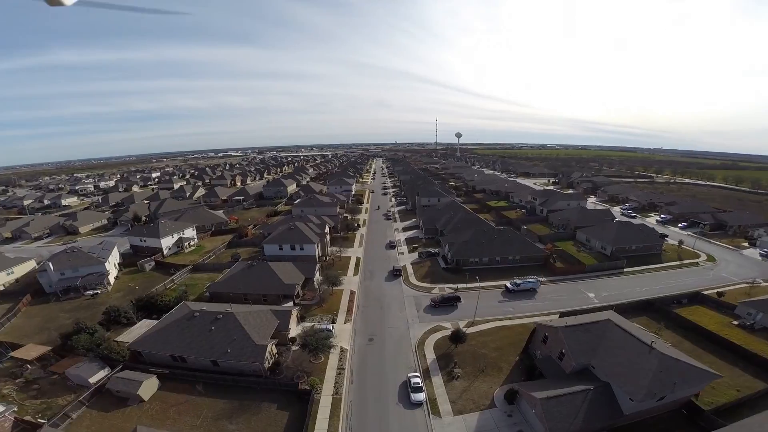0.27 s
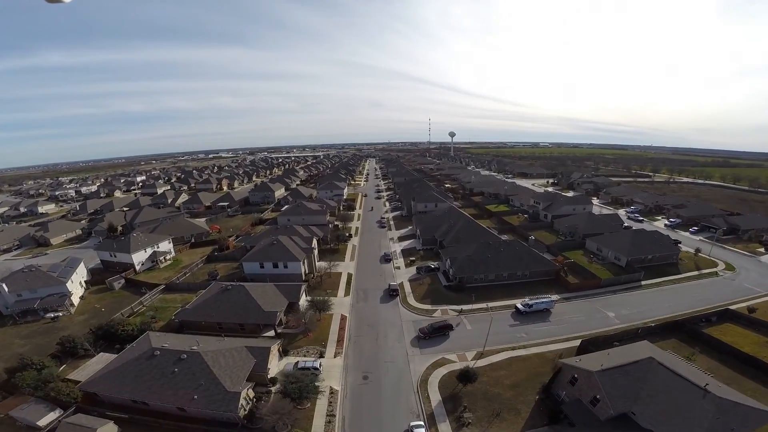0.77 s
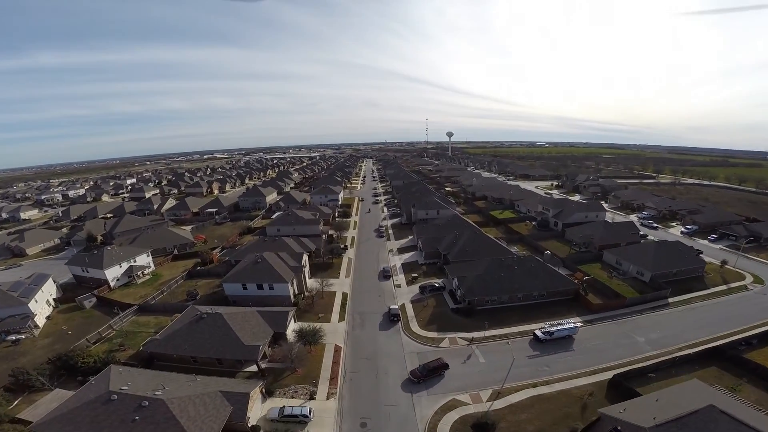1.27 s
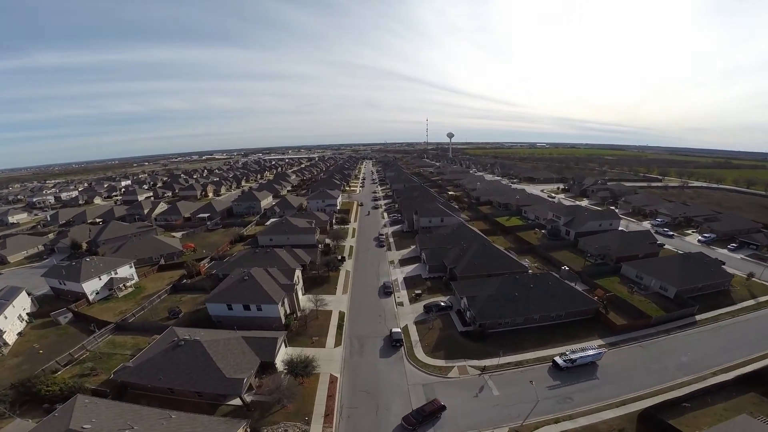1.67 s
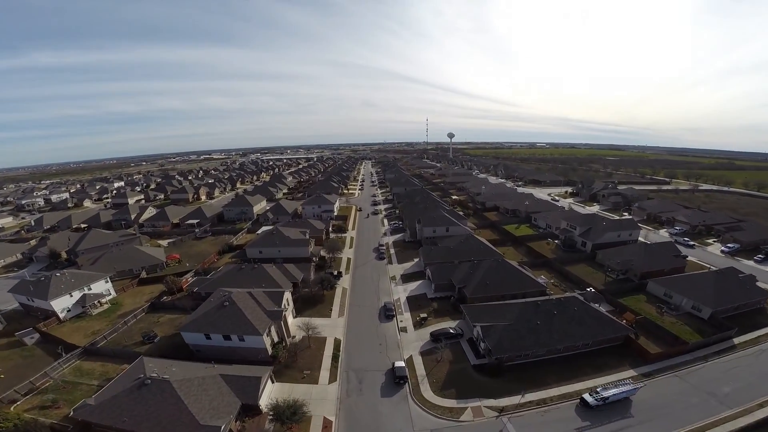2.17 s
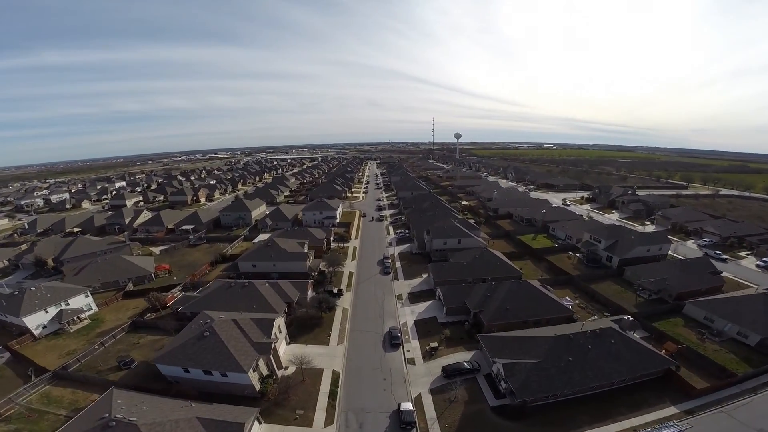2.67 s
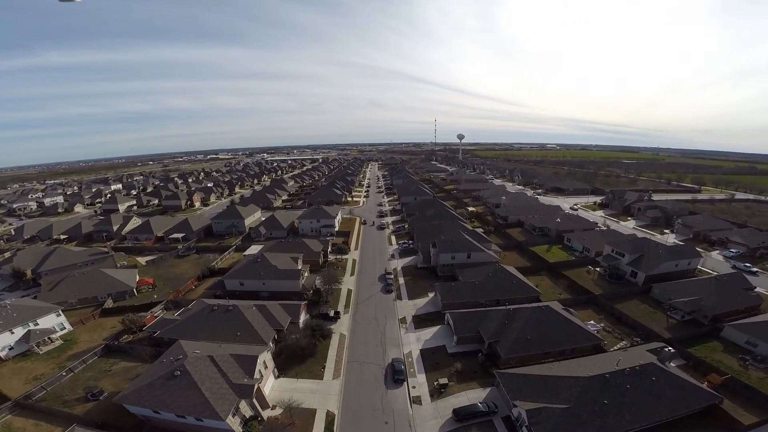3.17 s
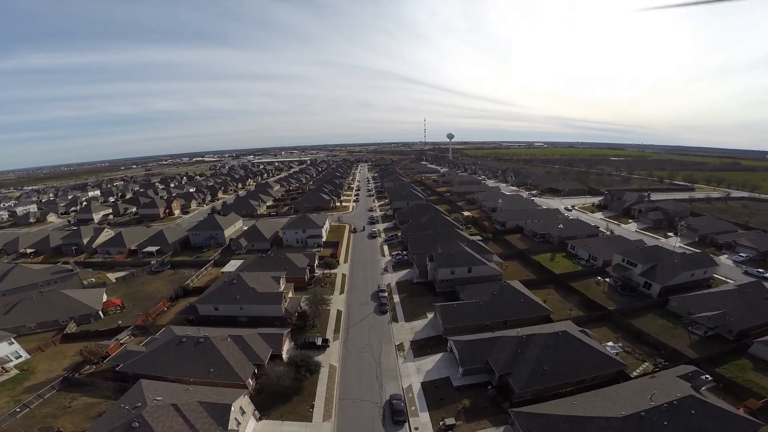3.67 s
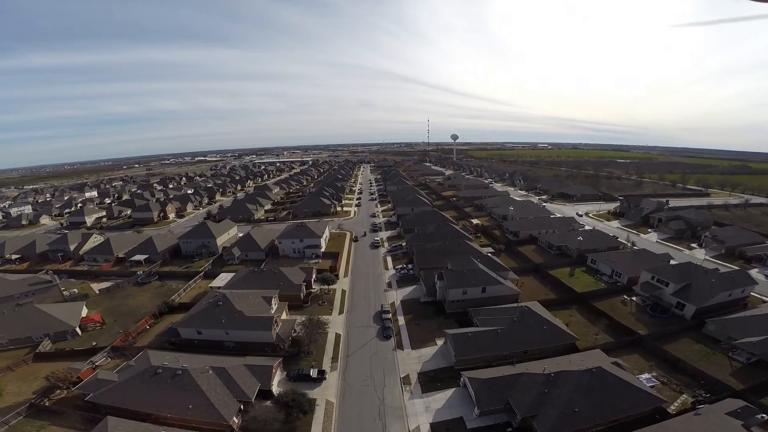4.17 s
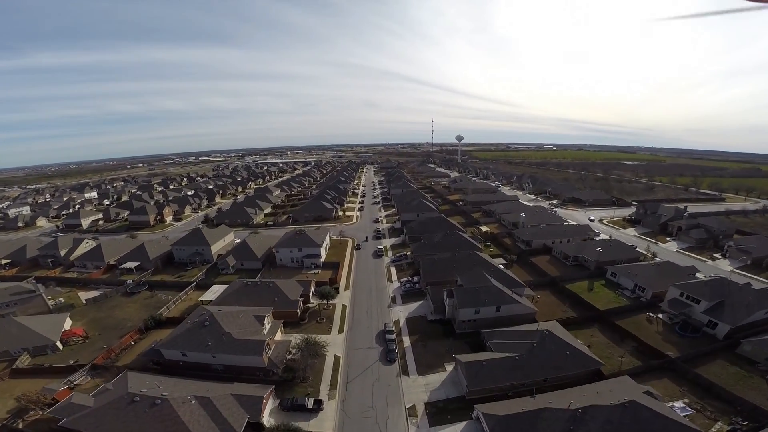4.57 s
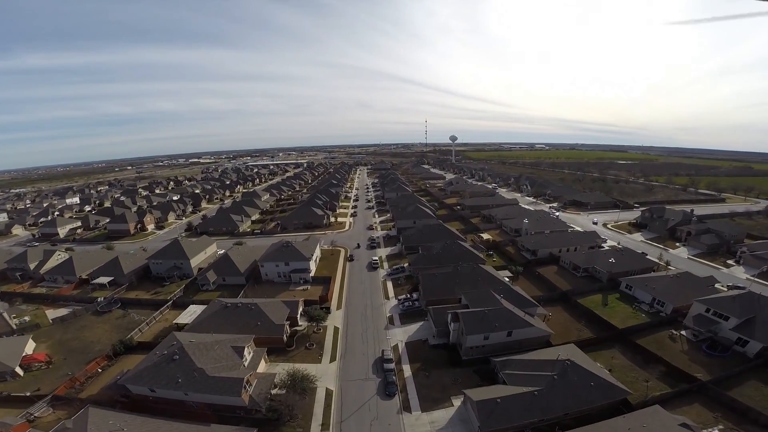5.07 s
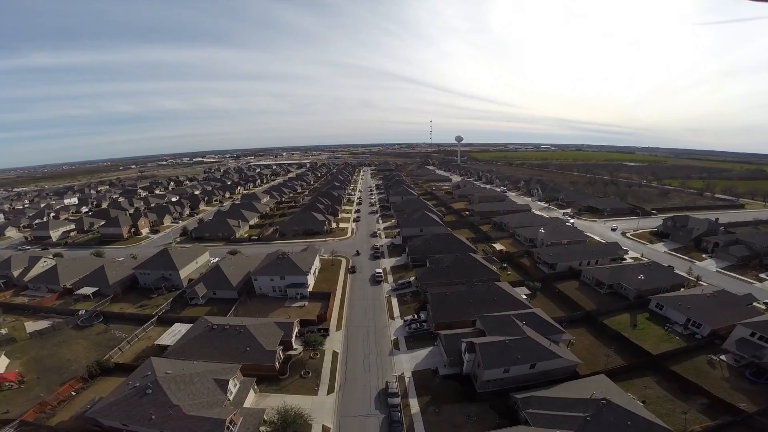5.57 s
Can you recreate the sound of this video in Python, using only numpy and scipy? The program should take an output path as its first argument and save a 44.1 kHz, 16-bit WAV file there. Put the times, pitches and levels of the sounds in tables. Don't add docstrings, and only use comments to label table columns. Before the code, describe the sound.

Onboard a small drone flying forward over houses, four rotors hum low and uneven, beating against each other under airy hiss and low wind rumble. At about 0.3 s a short hard rattle knocks the mount; the sound drops, climbs back over a second, and the buzz continues with soft gusts to the end.

```python
import sys
import numpy as np
from scipy import signal
from scipy.fft import rfft, irfft, next_fast_len
from scipy.io import wavfile
from scipy.ndimage import uniform_filter1d

SR = 44100
rng = np.random.default_rng(int(sys.argv[2]) if len(sys.argv) > 2 else 0)


def master(y):
    cut = np.clip(np.atleast_2d(y).T, -1, 1)
    pcm = np.round(cut * 32767)
    wavfile.write(sys.argv[1], SR, pcm.astype(np.int16))


def voltage_ratio(level):
    return 10 ** (np.asarray(level, float) / 20)


N = 257544
T = np.arange(N) / SR

# (time [s], rotor 1 [Hz], rotor 2 [Hz])
SLOW_PAIR = [(0.0, 93.5, 110.95), (0.4, 95.0, 106.57), (1.0, 97.3, 102.46), (1.45, 98.6, 105.29),
             (2.05, 95.2, 100.13), (2.6, 93.0, 102.13), (3.05, 92.0, 104.5), (3.35, 92.6, 99.66),
             (3.62, 93.0, 95.85), (3.89, 95.4, 95.49), (4.15, 92.8, 97.9), (4.6, 95.3, 102.75),
             (4.8, 96.6, 99.86), (4.97, 97.3, 96.76), (5.2, 96.6, 99.26), (5.5, 97.2, 103.07),
             (5.73, 98.6, 98.6), (5.84, 98.4, 99.81)]
# (time [s], rotor 3 [Hz], rotor 4 [Hz])
FAST_PAIR = [(0.0, 118.1, 124.8), (0.4, 117.9, 124), (1.0, 112.3, 119.65), (1.45, 116.6, 121.91),
             (2.05, 111.69, 120.09), (2.6, 112.92, 120.11), (3.05, 114.9, 121.91), (3.4, 113.1, 120.4),
             (3.7, 106.7, 117.2), (3.95, 108.7, 116), (4.15, 110.7, 118.3), (4.45, 112, 118.74),
             (4.7, 117, 120.61), (4.95, 111.5, 117.61), (5.2, 109.8, 118.21), (5.5, 115.9, 120.6),
             (5.65, 115.3, 118.1), (5.84, 113.1, 118.84)]
HUNT_HZ = 0.5
OPPOSED_S = 3.885

# (level at usual speed [dB], change per Hz faster [dB/Hz])
IMBALANCE = [(-25.7, -0.35), (-26.5, 0.34)]
# (usual speed [Hz], level there [dB], change per Hz faster [dB/Hz], waver [dB])
BLADES = [(95.9, -23, 0.08, 0.65), (98.8, -23.5, -0.72, 1.4), (113.2, -24.5, 0.92, 1.2),
          (119, -32, 0.13, 1.5)]
ARM_DB, ARM_HZ, ARM_WIDTH_HZ, ARM_WAVER_DB = -34.5, 728, 46, 2.6
# (time [s], length [s], lift [dB])
ARM_SURGE = (3.36, 0.23, 4.7)
# (rotor from 0 [index], multiple of turning rate [1], level against its blade tone [dB])
OVERTONES = [(0, 1, -19), (3, 1, -5), (0, 3, -18), (0, 4, -27), (0, 8, -28), (1, 3, -18.5), (0.5, 4, -25.5),
             (1, 7, -26), (2, 3, -24.5), (2, 4, -18), (2, 5, -26.5), (2, 6, -23.5), (2, 7, -27),
             (2, 8, -32), (3, 4, -16)]
# (rotor from 0 [index], multiple [1], level against its blade tone [dB])
WHINE = [(0, 42, -44), (1, 42, -37), (2, 42, -39), (3, 42, -37)]

# (time [s], length [s], lift [dB])
PUFFS = [(0.43, 0.16, 5), (0.699, 0.38, 4.5), (1.207, 0.31, 2), (1.746, 0.25, 5.5), (2.05, 0.35, 6),
         (2.45, 0.43, 2.5), (2.75, 0.25, 2), (3.067, 0.33, 5), (3.417, 0.28, 4.5), (3.69, 0.21, 4),
         (4.087, 0.2, 4), (4.707, 0.18, 0.5), (4.955, 0.37, 4), (5.25, 0.18, 2), (5.55, .25, 4.5),
         (5.745, 0.33, 4.5)]
HISS_DB, DOWNWASH_DB, SHELL_DB, WIND_DB = -51.5, -45, -39, -35.5
HISS_SHARE, SHELL_SHARE = 0.6, 0.28
# (pitch [Hz], level [dB per Hz])
HISS = [(3060, -7), (5200, -1.5), (5850, -6), (6790, -2.5), (9740, -10.5), (11600, -2), (13400, -4.5),
        (14700, -4.5), (15300, 2)]
# (pitch [Hz], level [dB per Hz])
DOWNWASH = [(1120, -8.5), (1900, -5), (2280, -8.5), (2850, -3), (3420, -6), (4040, -4.5), (4500, -0.5),
            (5140, -14), (6000, -33), (7800, -42), (13200, -120)]
# (pitch [Hz], width [Hz], level [dB])
PORT = [(4530, 410, -3)]
# (pitch [Hz], level [dB per Hz])
SHELL = [(60, -40), (150, 4.5), (270, 3.5), (420, -2.5), (620, -2.5), (850, -6), (1000, -7.5),
         (1400, -17.5), (2000, -15.5), (2400, -37)]
# (pitch [Hz], width [Hz], level [dB])
RINGS = [(295.5, 22, 11.5), (522.5, 57, 6.5), (744.5, 99, 15), (1218, 32, 7.5), (1294, 31, 14),
         (1690, 15, 12.5), (1757, 90, 6), (1850, 65, 3.5)]
# (pitch [Hz], width [Hz], share following the beat [0-1])
BUZZ = [(1820, 220, 0.74), (1296, 200, 0.33)]
PANEL_HZ, PANEL_DB = 1803, -52
# (pitch [Hz], level [dB per Hz])
RUMBLE = [(15, -9), (30, -4.5), (50, 0.5), (75, 0), (130, -2.5), (250, -24), (400, -9.5)]

# (time [s], force [dB], unevenness of alternate knocks [0-1])
RATTLE = [
    (.2720, -34, .9),
    (.2765, -8, .9),
    (.2810, -14, .9),
    (.2880, 3, .7),
    (.2940, 3.5, .08),
    (.3040, 0, .08),
    (.3110, -7, .9),
    (.3230, -22, .8),
    (.3400, -46, .8),
]
RATTLE_HZ = 504
# (pitch [Hz], width [Hz], level [dB])
MOUNT = [(272.3, 94, -1.5), (395, 110, -19), (555, 120, -5), (740, 270, -3), (1088, 172, -0.5),
         (1310, 106, -6), (1470, 220, -24), (1812, 170, -13), (2106, 140, -24.5), (2150, 270, -33),
         (2610, 150, -41)]
# (pitch [Hz], width [Hz], level [dB])
SCRAPE = [(3120, 430, 0), (4340, 510, 7.5), (5400, 560, -1), (11800, 1300, -15), (14800, 900, -12)]
SCRAPE_DB, SCRAPE_SHARE = -29.5, 0.76
SQUEAK_HZ, SQUEAK_DB, SQUEAK_SHARE, SQUEAK_LAG_S = 6960, -32.5, 0.57, 0.003

HELD_DB, DUCK_S, DUCK_DB, RECOVER_S = -6.5, 0.328, -13, 1.22
EDGE_HZ = 15200


def evened(x):
    return x / np.sqrt(np.mean(x ** 2) + 1e-20)


def columns(table, t=T):
    s, *rest = np.transpose(table)
    return np.array([np.interp(t, s, c) for c in rest])


def drift(hz):
    size, step = 8192, 32
    f = np.fft.rfftfreq(size, step / SR)
    smoothing = np.exp(-np.minimum(f / hz, 6) ** 2)
    slow = irfft(rfft(rng.standard_normal(size)) * smoothing, size)
    return np.interp(np.arange(N), np.arange(size) * step, evened(slow))


def swell(s, length):
    return np.exp(-((T - s) / length) ** 2)


def coloured(x, points, band, modes=()):
    size = next_fast_len(N, True)
    f = np.fft.rfftfreq(size, 1 / SR)
    hz, db = np.transpose(points)
    gain = voltage_ratio(np.interp(np.log(f + 1), np.log(hz + 1), db, left=-90, right=-90))
    gain = gain * (1 + sum(voltage_ratio(d) / (1 + (2 * (f - m) / w) ** 2) for m, w, d in modes))
    z = rfft(x, size) * gain
    inside = (f > band[0]) & (f < band[1])
    return irfft(z, size)[:N] * size / np.sqrt(2 * np.sum(abs(z[inside]) ** 2))


def resonate(x, hz, width):
    turn = np.exp(2j * np.pi * hz * np.arange(len(x)) / SR)
    r = np.exp(-np.pi * width / SR)
    return 2 * (turn * signal.lfilter([(1 - r) ** 2], [1, -2 * r, r * r], x / turn)).real


def tone(angle, db):
    return np.sqrt(2) * voltage_ratio(db) * np.sin(angle + 2 * np.pi * rng.random())


def rotor_turning():
    hz = np.vstack([columns(SLOW_PAIR), columns(FAST_PAIR)])
    hz = hz + HUNT_HZ * np.array([drift(4), drift(4)])[[0, 0, 1, 1]]
    angles = 2 * np.pi * np.cumsum(hz, axis=1) / SR
    return hz, angles - angles[:, [round(OPPOSED_S * SR)]]


def blade_load(hz):
    usual_hz, level_db, slope, _ = np.transpose(BLADES)[:, :, None]
    return level_db + slope * (hz - usual_hz)


def shaft_hum(hz, angles):
    hum = 0
    for r, (db, slope) in zip((0, 2), IMBALANCE):
        faster = hz[r] - BLADES[r][0]
        hum = hum + tone(angles[r], db + slope * faster + 1.8 * drift(12))
    return hum


def blade_tones(load_db, angles):
    waver_db = np.array([[w * drift(7.8)] for *_, w in BLADES])[:, 0]
    sides = np.array([[1], [-1], [1], [1]])
    return (np.sqrt(2) * sides * voltage_ratio(load_db + waver_db) * np.sin(2 * angles)).sum(axis=0)


def arm_ring(hz, angles):
    surge_s, length_s, surge_db = ARM_SURGE
    lift_db = -10 * np.log10(1 + (2 * (6 * hz[3] - ARM_HZ) / ARM_WIDTH_HZ) ** 2)
    lift_db = lift_db + surge_db * swell(surge_s, length_s)
    return tone(6 * angles[3] + 0.3 * drift(12), ARM_DB + lift_db + ARM_WAVER_DB * drift(9))


def overtones(load_db, angles):
    total = 0
    for r, k, db in OVERTONES:
        r = round(r)
        level_db = load_db[r] + db + 2.7 * drift(4.6)
        total = total + tone(round(k) * angles[r] + 0.2 * drift(8), level_db)
    return total


def magnet_whine(load_db, angles):
    total = 0
    for r, k, db in WHINE:
        r = round(r)
        level_db = load_db[r] + db + 4.5 * drift(6)
        total = total + tone(k * angles[r] + 2.5 * drift(12), level_db)
    return total


def chopped(angles, depths_db, flicker_db):
    sweep_db = sum(d * np.cos(2 * a) for a, d in zip(angles, depths_db))
    return rng.standard_normal(N) * voltage_ratio(sweep_db + flicker_db)


def tip_hiss(angles, gust_db, puffs, lumps):
    noise = chopped(angles, [2.2, 0.7, 0.8, 0.4], 0.3 * puffs + 0.35 * lumps)
    return voltage_ratio(HISS_DB + HISS_SHARE * gust_db) * coloured(noise, HISS, (9000, 15000))


def downwash(angles, gust_db, puffs, lumps):
    noise = chopped(angles, [2.3, 0.37, 0.92, 0.4], 0.73 * puffs + 0.31 * lumps)
    return voltage_ratio(DOWNWASH_DB + gust_db) * coloured(noise, DOWNWASH, (2200, 5500), PORT)


def ringing_shell(angles, gust_db, puffs, lumps):
    noise = chopped(angles, [3.1, 0.22, 1.5, 0.13], 0.77 * puffs + 2.5 * lumps)
    shell = coloured(noise, SHELL, (330, 680), RINGS)
    beat = np.sqrt(2) * abs(np.sin(angles[1] - angles[0]))
    shell = shell + sum(np.clip(share, 0, 1) * (beat - 1) * resonate(shell, hz, w) for hz, w, share in BUZZ)
    panel = beat * tone(2 * np.pi * PANEL_HZ * T + 1.2 * drift(5.6), PANEL_DB + 1.4 * drift(25))
    return voltage_ratio(SHELL_DB + SHELL_SHARE * gust_db) * shell + panel


def wind():
    noise = rng.standard_normal(N) * voltage_ratio(2.5 * drift(2.8))
    return voltage_ratio(WIND_DB) * coloured(noise, RUMBLE, (20, 75))


def mount_rattle():
    t = np.arange(0.26, 0.37, 1 / SR)
    force_db, uneven = columns(RATTLE, t)
    half = np.pi * RATTLE_HZ * (t - 0.2882)
    knocks = sum((1.18 * uneven if k % 2 else 1) * np.cos(k * half) for k in range(1, 12))
    grit = rng.standard_normal(len(t))
    blows = voltage_ratio(force_db) * (knocks + (0.8 + 2.4 * uneven) * grit)
    ring = 0
    for k, (hz, w, db) in enumerate(MOUNT):
        side = (-1) ** (k // 2)
        ring = ring + side * voltage_ratio(db) * resonate(blows, hz, w)

    rubbing = grit * (1 + 0.34 * np.cos(half))
    scrape = evened(sum(voltage_ratio(db) * resonate(rubbing, hz, w) for hz, w, db in SCRAPE))
    scrape_db = SCRAPE_DB + SCRAPE_SHARE * force_db - 300 * np.maximum(t - 0.292, 0)
    squeak = evened(resonate(grit, SQUEAK_HZ, 800)) * np.hanning(len(t))
    squeak_db = SQUEAK_DB + SQUEAK_SHARE * columns(RATTLE, t - SQUEAK_LAG_S)[0]
    out = np.zeros(N)
    start = round(t[0] * SR)
    out[start:start + len(t)] = ring + voltage_ratio(scrape_db) * scrape + voltage_ratio(squeak_db) * squeak
    return out


def scene():
    hz, angles = rotor_turning()
    load_db = blade_load(hz)
    rotors = shaft_hum(hz, angles) + blade_tones(load_db, angles) + arm_ring(hz, angles)
    rotors = rotors + overtones(load_db, angles) + magnet_whine(load_db, angles)

    gust_db = sum(db * swell(s, 0.52 * length) for s, length, db in PUFFS)
    flow = angles, gust_db, drift(27), drift(268)
    air = tip_hiss(*flow) + downwash(*flow) + ringing_shell(*flow) + wind()
    return (rotors + air + mount_rattle())[None]


def low_pass(x):
    return signal.sosfilt(signal.butter(12, 16520, fs=SR, output="sos"), x)


def record(dry):
    climb_db = DUCK_DB * np.clip(1 - (T - DUCK_S) / RECOVER_S, 0, 1) ** 1.89
    gain_db = uniform_filter1d(np.where(T < DUCK_S, HELD_DB, climb_db), size=800)
    ducked = dry * voltage_ratio(gain_db)
    limited = ducked / (1 + (ducked / 0.92) ** 6) ** (1 / 6)
    edge = signal.firwin(401, EDGE_HZ, window=("kaiser", 9), fs=SR)
    mix = signal.oaconvolve(limited, edge[None], "same")
    return low_pass(mix)


dry = scene()
out = record(dry)
master(out)
```